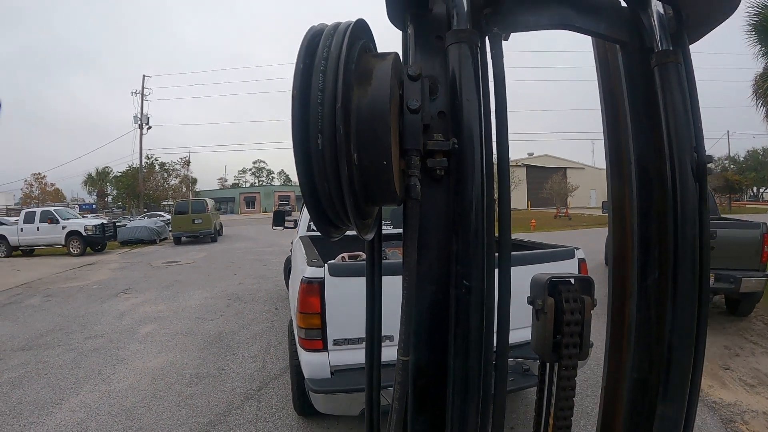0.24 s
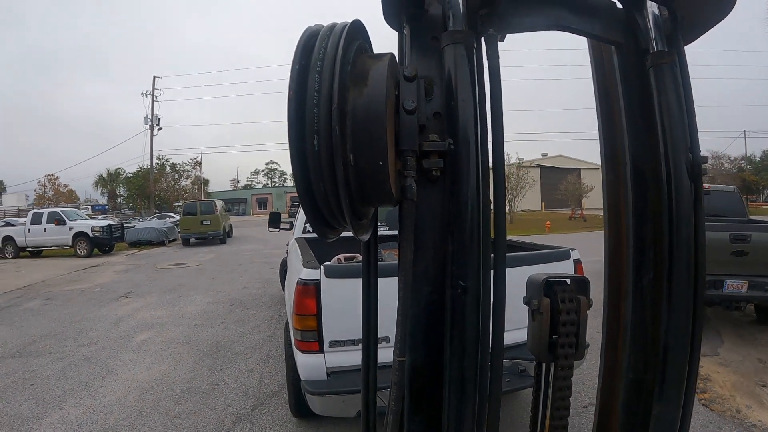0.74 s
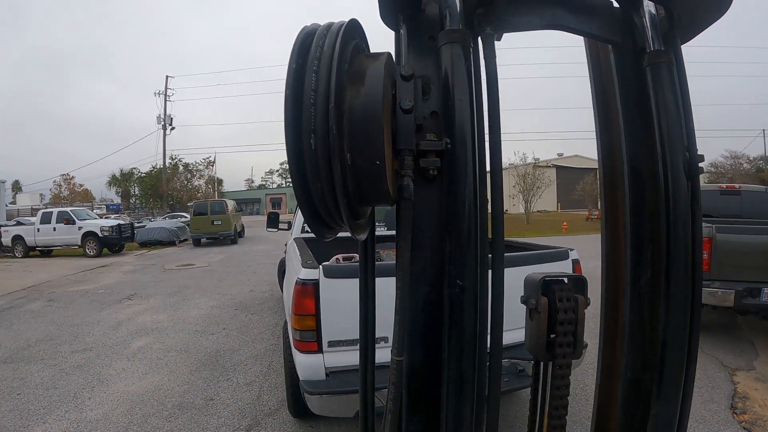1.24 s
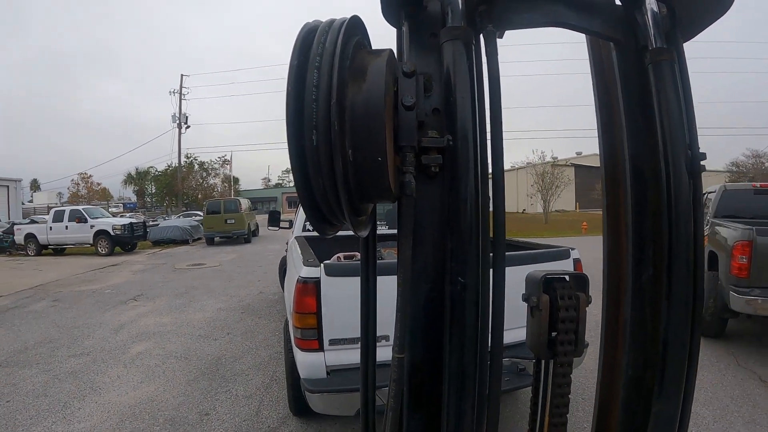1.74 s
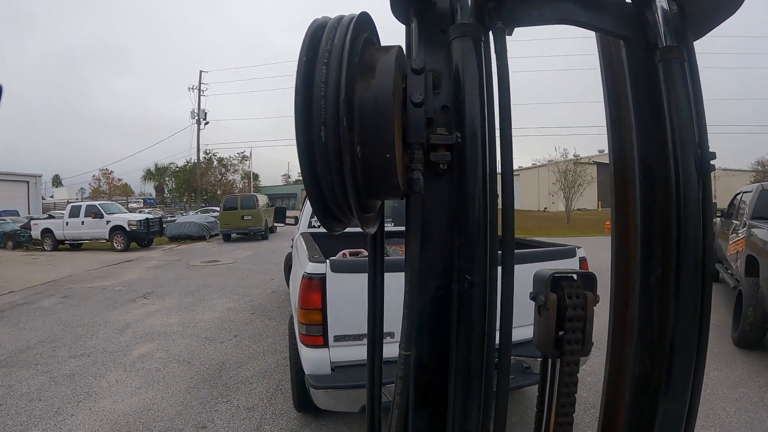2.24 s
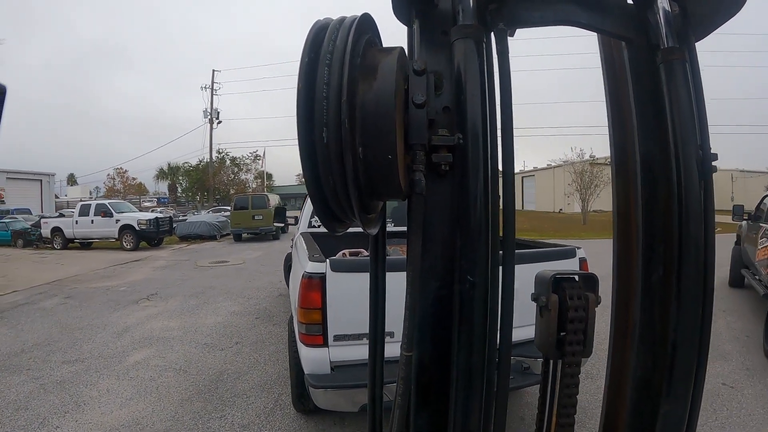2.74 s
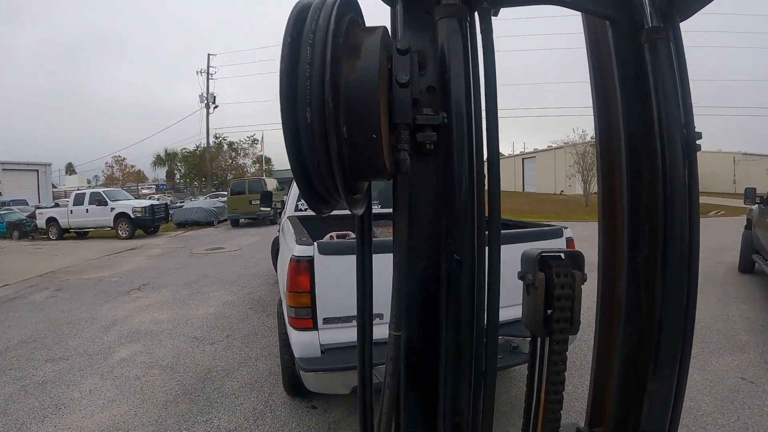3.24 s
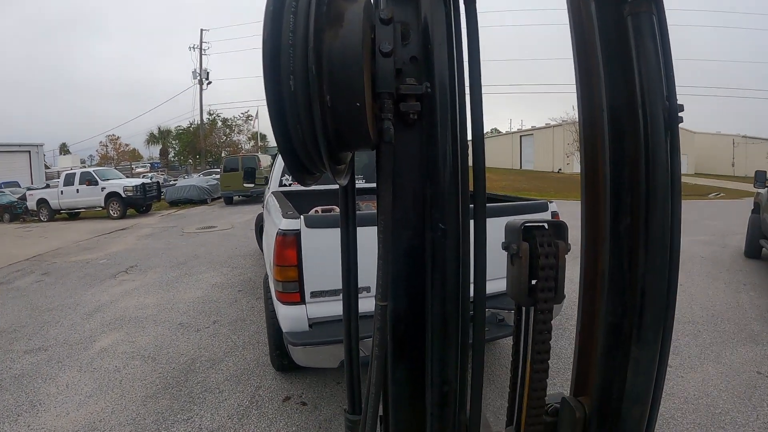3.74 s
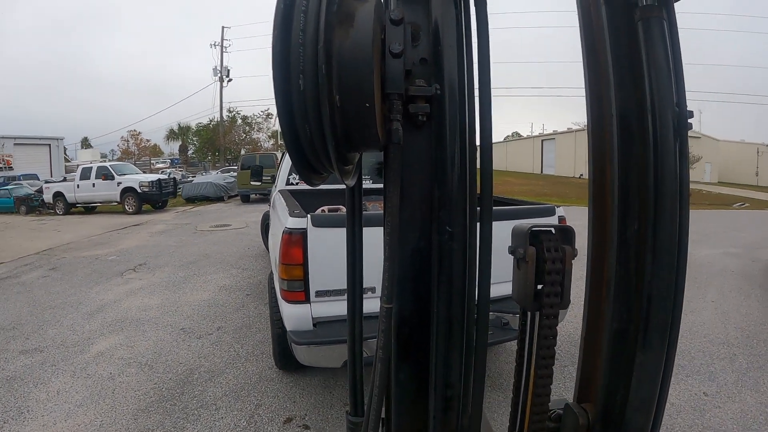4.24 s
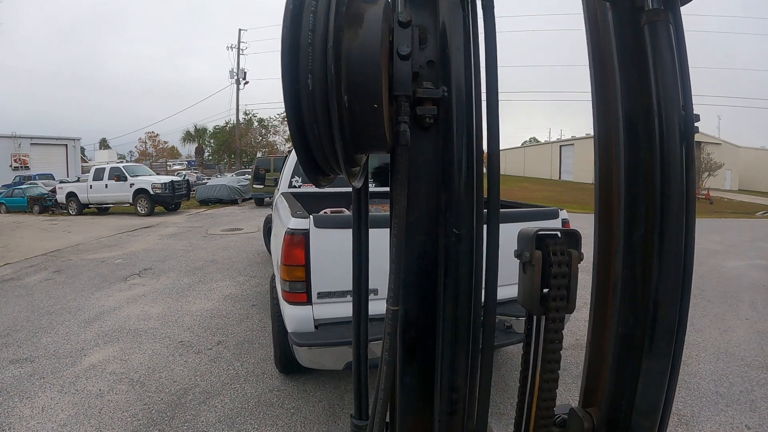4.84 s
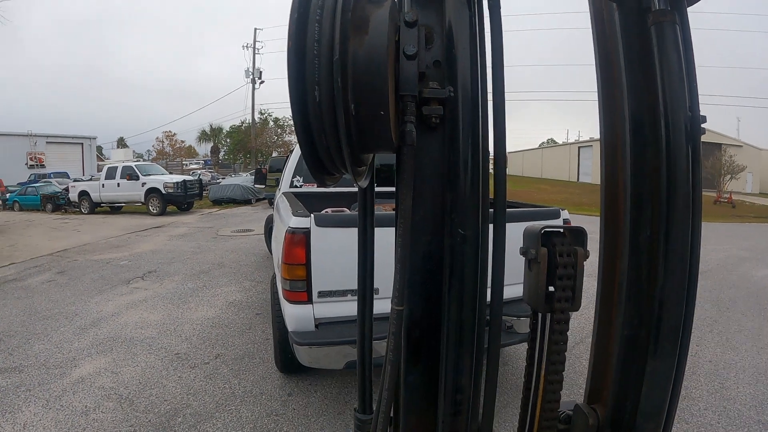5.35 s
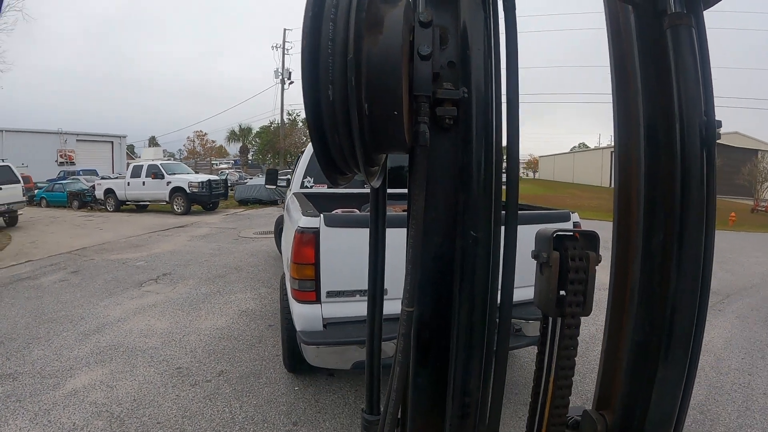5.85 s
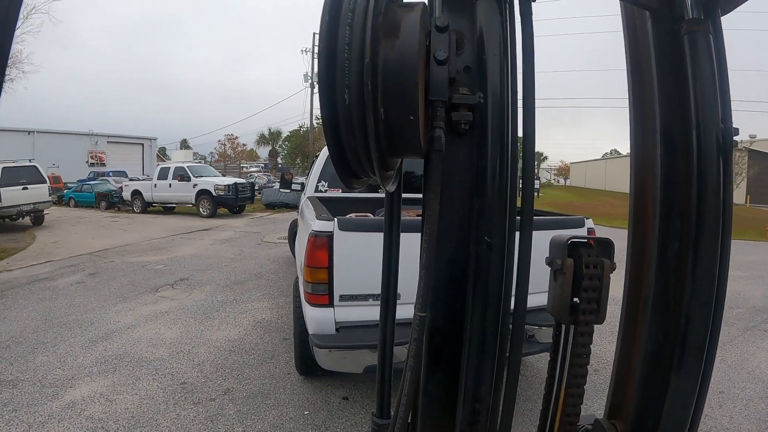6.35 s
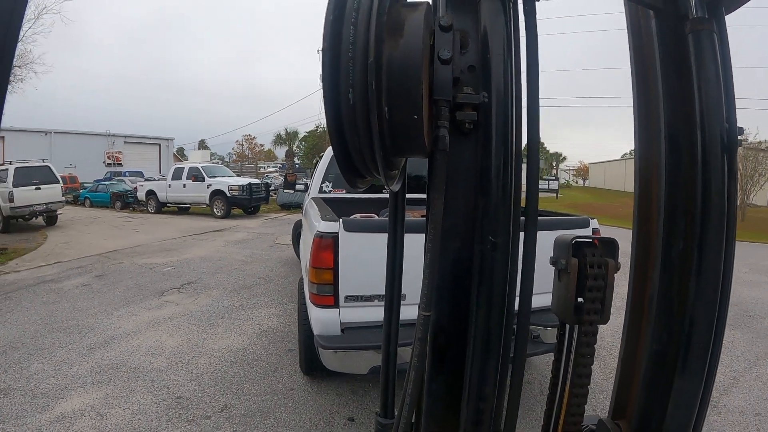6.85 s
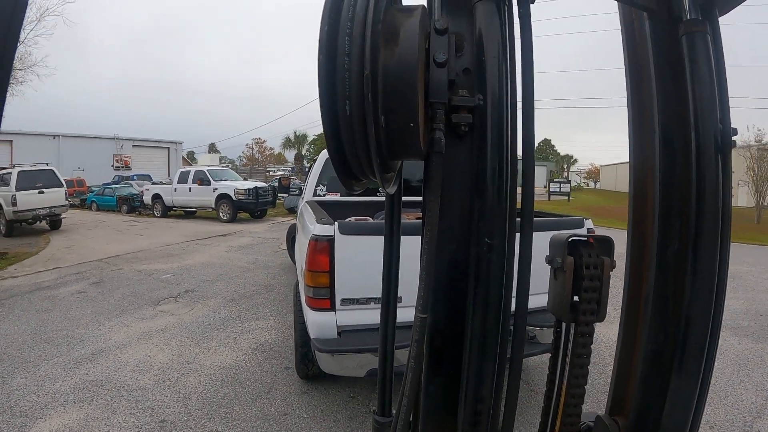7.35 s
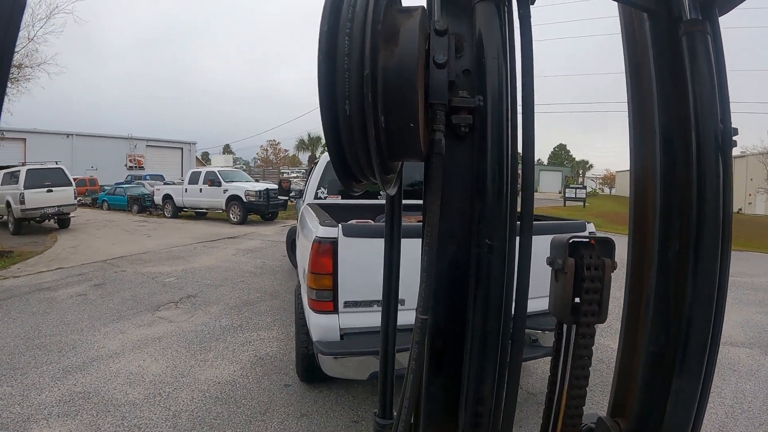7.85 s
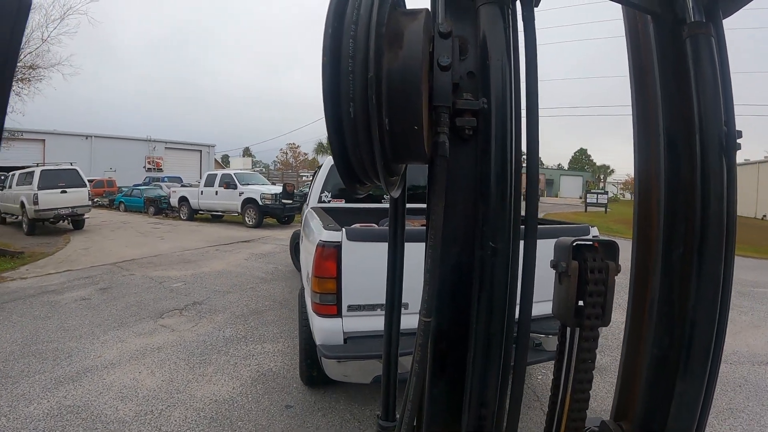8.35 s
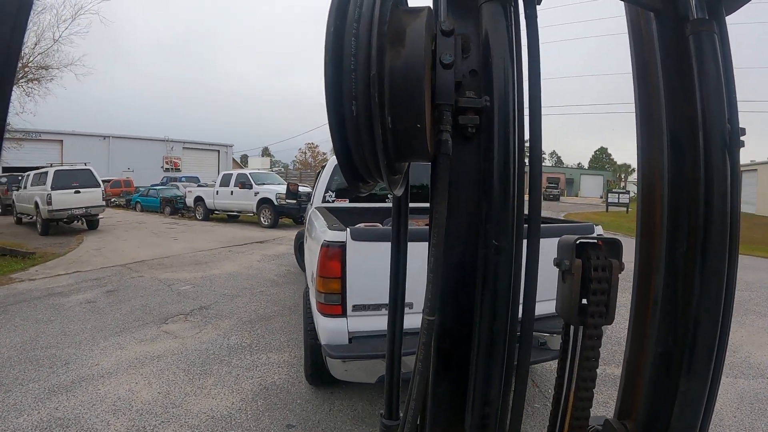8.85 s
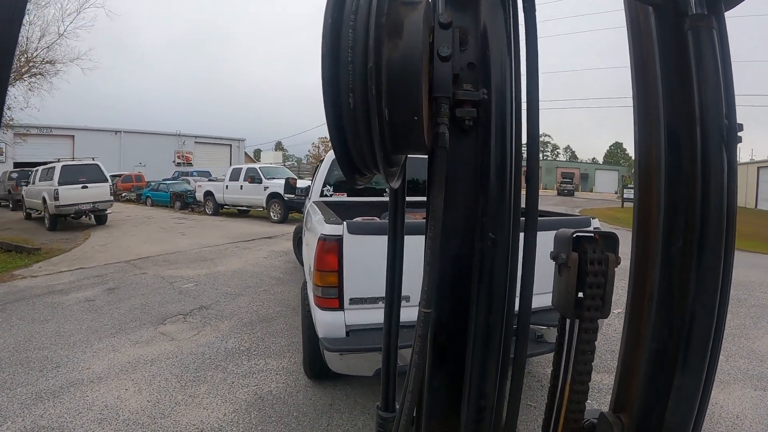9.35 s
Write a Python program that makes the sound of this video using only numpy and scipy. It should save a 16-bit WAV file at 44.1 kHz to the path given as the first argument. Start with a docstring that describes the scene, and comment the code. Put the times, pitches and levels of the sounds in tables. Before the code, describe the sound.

Heard from the driver's seat outdoors, a four-cylinder forklift engine holds a deep, steady throb with droning hood resonance, rattling valve noise and a faint breathy whistle. Loose chain slaps lightly against the mast. Near the middle a hard metallic knock and tiny squeal land as the engine drops away, then it races, sags toward idle, surges again, dips and settles.

```python
"""A parking lot: a four-cylinder forklift drives across it, heard from the driver's seat.
The exhaust booms at the firing rate and the hollow under the hood drones on multiples of it.
Noise bursts from valves and pistons ring the hood panels; each gulp of air whistles on a gliding tone.
Filtered impacts make the mast buzz, slap, clack and knock, with short squeaks; low noise is the chassis.
The engine drops away briefly, surges, dips and surges again, then settles."""
import sys
import numpy as np
from scipy import signal
from scipy.fft import rfft, irfft
from scipy.io import wavfile

SR = 44100
rng = np.random.default_rng(int(sys.argv[2]) if len(sys.argv) > 2 else 0)


def wav_record(signal):
    """Record a signal, one row per channel, as 16-bit PCM in the file named by sys.argv[1]."""
    frames = np.transpose(np.atleast_2d(signal))
    bounded = np.clip(frames, -1, 1)
    # unit amplitude maps onto the largest positive 16-bit level
    quanta = np.round(bounded * 32767).astype(np.int16)
    wavfile.write(sys.argv[1], SR, quanta)


N = 423360
T = np.arange(N) / SR
HZ = np.fft.rfftfreq(N, 1 / SR)

CRUISE_HZ = 51.0  # firing rate at cruising speed
LUG_HZ = 2.3  # the engine is fully labouring this far below cruising speed
GULP = .55  # how deeply each intake stroke swells the whistle
SLAP_DECAY_S = .0055  # how fast each slap of the chain dies
EDGE_HZ = 15700  # the treble is cut off above this
# the engine drops away once: start, hold, fade and return
LULL_S, LULL_HOLD_S, LULL_FADE_S, LULL_RETURN_S = 4.42, 0.24, 0.15, 0.15

# engine speed: (time [s], firing rate [Hz])
FIRING_RATE = [(0.0, 51.8), (1.84, 50.3), (4.42, 51.8), (4.6, 50.3), (4.76, 39.5), (4.93, 58), (5.03, 65.5),
               (5.22, 60.7), (5.42, 58.4), (5.54, 55), (5.68, 44.5), (6.0, 38.7), (6.2, 39.8), (6.42, 39.6),
               (6.68, 59.5), (6.86, 57.3), (7.12, 46.5), (7.28, 40.8), (7.56, 51.6), (8.1, 50.2),
               (8.55, 51), (8.73, 48.3), (8.98, 51.8), (9.28, 46.3), (9.6, 48)]
# exhaust boom: (time [s], level [dB])
BOOM_LEVEL = [(0, -18), (4.4, -18), (4.52, -22), (4.68, -31.5), (4.9, -17.5), (5.1, -19.5), (5.45, -20.5),
              (5.83, -25), (6.05, -20.5), (6.4, -21.5), (6.65, -18), (7.0, -20.5), (7.2, -25.5),
              (7.36, -17), (8.35, -17.5), (8.6, -23), (8.8, -18), (9.6, -21)]
# weak firings: (time [s], share of the boom lost [0-1])
WEAK_FIRINGS = [(.71, 0.78), (1.77, .5), (1.93, 0.37), (2.09, .45), (2.43, .7), (2.99, .55), (3.25, 0.36)]
# engine orders in the hollow under the hood: (multiple of the firing rate [x], relative level [dB])
ENGINE_ORDERS = [(2.5, -10.5), (3, -7), (3.5, 2), (4, -3.5), (4.5, -3), (5, 0.5)]
# spectrum of the hollow under the hood: (frequency [Hz], relative density [dB per Hz])
HOLLOW = [(60, -38), (120, -7.5), (155, -8.5), (182, -4.5), (204, 0), (230, -5.5), (258, -13.5),
          (310, -19.5), (400, -35.5), (1000, -77.5)]
# spectrum of the engine block: (frequency [Hz], relative density [dB per Hz])
BLOCK = [(40, -1), (280, 4), (460, 0.5), (850, -1), (1100, -1), (1950, 1), (2220, -10.5), (2500, -12),
         (3400, -15.5), (4100, -20), (7600, -29.5), (8300, -34), (10000, -35.5), (11000, -44), (15000, -56)]
# resonances of the hood panels: (frequency [Hz], width [Hz], lift [dB])
HOOD_PANELS = [(379.4, 63, 6), (601, 55, 7), (674.2, 91.6, 13.5), (764, 60, 4.5), (936.4, 69, 8.5),
               (1031.6, 71.3, 15.5), (1189, 87, 6), (1635, 117, 5), (1885, 110, 2), (3295, 115, 5),
               (4540, 240, 11), (9140, 730, 6)]
# spectrum of the hood drumming near idle: (frequency [Hz], relative density [dB per Hz])
HOOD_DRUM = [(40, -41), (150, -25), (300, -3.5), (450, -20), (610, 1), (690, 4.5), (800, -8), (1500, -50),
             (5000, -83)]
# thin upper whistle notes: (frequency [Hz], relative level [dB], lag [rad], sounds on every n-th stroke [n])
UPPER_NOTES = [(9830, -7, -.6, 2), (8780, -7, 1.2, 4)]
# spectrum of the lift chain: (frequency [Hz], relative density [dB per Hz])
CHAIN = [(200, -25), (800, -11), (2200, -6), (3700, 4), (5200, 0), (7400, -11.5), (8700, -13.5),
         (12000, -32), (16000, -48)]
# ringing of the chain's links: (frequency [Hz], width [Hz], lift [dB])
CHAIN_LINKS = [(3660, 88, 4), (4530, 91, 3), (5150, 220, 7.5), (6860, 110, 13.5), (7370, 140, 11)]
# slaps of the loose chain on the mast: (time [s], relative level [dB])
CHAIN_SLAPS = [(.033, -33), (.052, -27), (.072, -31), (.843, -35), (1.734, -31), (1.778, -34), (2.011, -33),
               (2.071, -29), (2.091, -29), (2.129, -31), (2.149, -33), (2.170, -26.5), (2.208, -32),
               (2.228, -31), (2.247, -29), (2.289, -31), (2.310, -31), (2.859, -33), (3.778, -31),
               (3.888, -30), (4.005, -32), (4.082, -34), (4.160, -31), (4.178, -28), (4.276, -29),
               (4.295, -28), (4.966, -31), (5.026, -35), (5.258, -35), (5.491, -33)]
# spectrum of loose steel: (frequency [Hz], relative density [dB per Hz])
LOOSE_STEEL = [(200, -20), (800, -3), (2200, -8), (3600, 2), (5200, 1), (7400, -3), (8700, -12),
               (12000, -24), (16000, -42)]
# clacks of loose mast parts: (time [s], relative level [dB], decay time [s])
CLACKS = [(4.387, -25, .007), (4.401, -24, .005), (4.412, -26, .004), (4.43, -29, .004), (4.453, -32, .005),
          (4.462, -28.5, .007), (4.473, -28, .004), (4.487, -37, .005), (4.532, -26, .006),
          (7.412, -34, .005), (7.417, -28.5, .004), (7.422, -28.5, .006), (8.589, -35, .008)]
# spectrum of the heavy frame: (frequency [Hz], relative density [dB per Hz])
HEAVY_FRAME = [(30, -10), (95, 5), (180, 1), (280, -6), (550, -4), (820, -3), (1400, -4), (1900, -1.5),
               (2400, -12), (3500, -8), (6000, -25), (11000, -37), (15000, -48)]
# heavy knocks of the mast on its frame: (time [s], relative level [dB], decay time [s])
KNOCKS = [(4.389, -13, .006), (4.400, -7.5, .005), (4.408, -9, .005), (4.421, -17, .005),
          (4.437, -19, .006)]
# ringing modes of the mast: (frequency [Hz], lift [dB], time to fall 60 dB [s])
MAST_MODES = [(544, 5, .06), (813, 10, .15), (995, 4, .04), (1755, 4, .06), (1992, 7, .06), (2686, 7, .06),
              (3219, 5, .05), (3860, 6, .05), (4554, 5, .05), (5340, 3, .04), (6780, 2, .04),
              (7418, 7, .06)]
# notes of the dry metal squeal: (frequency [Hz], relative level [dB])
SQUEAL_NOTES = [(4560, -1), (7420, 4), (8470, -13), (10420, -19)]
# squeaks of the mast: (time [s], level [dB], length [s])
SQUEAKS = [(4.389, -23, 0.01), (4.408, -41, 0.026), (5.188, -40.5, 0.015)]
# spectrum of the chassis rumble: (frequency [Hz], relative density [dB per Hz])
CHASSIS = [(10, -25), (22, -15), (35, 2), (75, -2.5), (110, -8.5), (200, -35.5), (500, -85.5)]
# shudders of the chassis as the drive takes up or sheds load: (time [s], lift [dB], half length [s])
SHUDDERS = [(5.25, 4.5, 0.17), (5.87, 2, 0.16), (6.7, 7, 0.35), (7.22, 0.5, 0.1), (8.57, 11.5, 0.22),
            (9.43, 1.5, 0.081)]
# how layers follow the engine, as single rows:
# (relative level at cruise [dB], change per octave of speed [dB], when labouring [dB], in the lull [dB])
DRONE_LAW = (-29.5, 6, 1, -5)
CLATTER_LAW = (-26.5, 2.5, -1, -4.5)
BUZZ_LAW = (-54.5, 8, -2, -3)
SHAKE_LAW = (-34, 3.5, 6.5, -8)
# likeness of the left and right sides: (frequency [Hz], likeness [0-1])
LIKENESS = [(60, 1.0), (96, 0.99), (150, 0.98), (240, 0.99), (430, 0.98), (640, 0.95), (1000, 0.96),
            (1400, .89), (2000, .82), (2400, .6), (3200, .72), (4600, .76), (6830, .67), (10100, .6)]
# balance of the sides: (frequency [Hz], left minus right [dB])
LEAN = [(60, -.5), (96, -1), (150, 0.0), (290, .3), (400, 1.7), (750, 2.6), (900, 4.4), (1700, 3.8),
        (2400, -2.5), (3250, 5), (4300, -1.5), (5400, .8), (6400, -1), (9500, 3)]
# phase by which the left side leads: (frequency [Hz], lead [rad])
LEAD = [(1000, 0), (2150, -1.45), (2400, 0), (3400, -.95), (4400, -.1), (6000, 0)]


def amp(db):
    """Decibels to gain."""
    return np.exp(np.log(10) / 20 * np.asarray(db))


def unit(x):
    """Scales to rms 1."""
    return x / np.sqrt(np.mean(x ** 2) + 1e-20)


def curves(rows):
    """Each column of a time table, sample by sample."""
    s, *columns = np.transpose(rows)
    return [np.interp(T, s, c) for c in columns]


def read(points, at=HZ):
    """A spectrum joined on a log-frequency axis."""
    hz, value = np.transpose(points)
    return np.interp(np.log(at + 1), np.log(hz + 1), value)


def wander(rate_hz):
    """Random drift of rms 1, mostly slower than the given rate."""
    slow_hz = HZ[:N // 32]
    a, b = rng.standard_normal((2, len(slow_hz)))
    return unit(irfft((a + 1j * b) / (1 + (slow_hz / rate_hz) ** 4), N))


def colour(x, spectrum, resonances=()):
    """Causal filter of unit power: a broad spectrum with ringing peaks on top."""
    peaks_db = sum(lift * np.exp2(-(2 * (HZ - hz) / width) ** 2) for hz, width, lift in resonances)
    cepstrum = irfft(np.log(unit(amp(read(spectrum) + peaks_db))), N)
    # folding the cepstrum forward gives minimum phase, so nothing sounds before its cause
    cepstrum[1:N // 2] *= 2
    cepstrum[N // 2 + 1:] = 0
    return irfft(rfft(x) * np.exp(rfft(cepstrum)), N)


def spread(pair):
    """Two signals become a stereo pair: alike in the bass, looser and out of step in the treble."""
    a, b = rfft(pair)
    same = np.clip(read(LIKENESS), 0, 1)
    mid = a * np.sqrt((1 + same) / 2)
    side = b * np.sqrt((1 - same) / 2)
    lean = amp(read(LEAN) / 2) * np.exp(.5j * read(LEAD))
    return irfft(np.array([(mid + side) * lean, (mid - side) / lean]), N)


def lull():
    """Rises from 0 to 1 as the engine drops away, holds, and lets go."""
    end = LULL_S + LULL_FADE_S + LULL_HOLD_S + LULL_RETURN_S
    return np.clip(np.minimum((T - LULL_S) / LULL_FADE_S, (end - T) / LULL_RETURN_S), 0, 1)


def level(law, fire_hz):
    """A layer's dB from the engine's speed, its labouring at low revs and the lull."""
    cruise_db, octave_db, lug_db, lull_db = law
    labour = np.clip((CRUISE_HZ - fire_hz) / LUG_HZ, 0, 1) ** 2
    return cruise_db + octave_db * np.log2(fire_hz / CRUISE_HZ) + lug_db * labour + lull_db * lull()


def works(firings, repeat, throb):
    """Valve and piston noise, pulsing with each firing; a share repeats every four firings."""
    size = int(4 * SR / CRUISE_HZ)
    pattern = signal.resample(rng.standard_normal((2, size)), size * 8, axis=1)
    place = (firings % 4 / 4 * pattern.shape[1]).astype(int)
    cycle = unit(pattern[:, place])
    noise = np.sqrt(repeat) * cycle + np.sqrt(1 - repeat) * rng.standard_normal((2, N))
    return unit(noise * np.exp(throb * np.cos(2 * np.pi * firings)))


def exhaust(firings, fire_hz, boom_db, waver_db=0.5, second_db=-14.0, rev_db=14,
            rock_db=-29, rock_hz=31, rock_width_hz=3.0, stumble_s=0.015):
    """A clean boom at the firing rate that stumbles on weak firings; its octave grows away from cruise."""
    angle = 2 * np.pi * firings
    lost = sum(share * np.exp(-((T - s) / stumble_s) ** 2) for s, share in WEAK_FIRINGS)
    boom = amp(boom_db + waver_db * wander(5.3)) * (1 - lost) * np.cos(angle)
    off_cruise_db = rev_db * abs(np.log(fire_hz / CRUISE_HZ))
    octave = amp(boom_db + second_db + off_cruise_db + 1.2 * wander(7)) * np.cos(2 * angle + 1)
    # once a turn (two firings) the crank rocks the engine on its mounts, which resonate at high revs
    mounts = 1 / (1 + ((fire_hz / 2 - rock_hz) / rock_width_hz) ** 2)
    rocking = amp(rock_db) * mounts * np.cos(angle / 2)
    return np.sqrt(2) * (boom + octave + rocking)


def drone(firings, fire_hz, drone_db, rough_db=0.5, clear_db=2.0,
          hollow_hz=200, hollow_width_hz=16, hollow_db=3):
    """Rough noise fills the hollow under the hood; as the engine races, its orders stand clear of it."""
    smooth_db, buried_db, blur, racing_hz, heave_db = 5, 9, 1.3, 6, .8
    calm = 1 - np.clip((fire_hz - CRUISE_HZ) / racing_hz, 0, 1)
    noise = works(firings, repeat=0.04, throb=0.23)
    rough = colour(noise, HOLLOW, [(hollow_hz, hollow_width_hz, hollow_db)])
    rough = rough * amp(rough_db - smooth_db * (1 - calm) + heave_db * wander(2.4))
    orders = np.zeros(N)
    for k, db in ENGINE_ORDERS:
        # each order swells as it glides through the hollow's resonance
        gain = amp(db + read(HOLLOW, k * fire_hz))
        orders += gain * np.cos(2 * np.pi * k * firings + blur * calm * wander(3.94))
    return (spread(rough) + np.sqrt(2) * orders * amp(clear_db - buried_db * calm)) * amp(drone_db)


def clatter(firings, effort_db, level_db=1, flicker_db=1.0):
    """The engine's valve and piston noise rings the hood panels."""
    drive = works(firings, repeat=0.33, throb=0.16)
    return colour(drive * amp(effort_db + level_db + flicker_db * wander(25)), BLOCK, HOOD_PANELS)


def drumming(firings, fire_hz, level_db=-32, below_hz=44, full_hz=40, lull_db=-14):
    """Near idle the engine's shaking sets the hood drumming."""
    idle = np.clip((below_hz - fire_hz) / (below_hz - full_hz), 0, 1)
    drive = works(firings, repeat=0.23, throb=0.17)
    return colour(drive * idle * amp(level_db + lull_db * lull()), HOOD_DRUM)


def whistle(firings, fire_hz, effort_db, pitch_hz=4720, lift_hz=230, follow=1.4):
    """Each intake stroke whistles from high to low; strokes vary, and slow ones gulp deeper."""
    level_db, uneven_db, slow_db = -51.5, 1.8, 6
    swing_hz, swing_uneven, snap, sloppy = 140, .3, 2.5, .4
    breath, jitter_hz, blur_hz = 1.0, 110, 300
    upper_uneven_db, upper_slow_db = 3, 12
    angle = 2 * np.pi * firings + sloppy * wander(24.88)
    slow = CRUISE_HZ / fire_hz
    effort = follow * (effort_db - np.median(effort_db))
    loudness = amp(level_db + effort + slow_db * np.maximum(slow - 1, 0) + uneven_db * wander(19))
    swing = swing_hz * slow ** 2 * (1 + swing_uneven * wander(24.9))
    main_hz = pitch_hz + lift_hz * (slow - 1) + swing * np.tanh(snap * np.cos(angle + 1.31))

    def note(hz, late):
        """A breathy tone of unsteady pitch that swells with each stroke."""
        phase = 2 * np.pi * np.cumsum(hz + jitter_hz * wander(50.25)) / SR
        steady = (slow + breath * wander(blur_hz)) * np.cos(phase)
        tone = steady + breath * wander(blur_hz) * np.sin(phase)
        return tone * unit(np.exp(GULP * slow ** 2 * np.cos(angle - late)))

    def beat(late, every):
        """Opens on every n-th stroke."""
        its_turn = np.round((angle - late) / (2 * np.pi)) % every == 0
        return np.clip(1 + np.cos(angle - late), 0, 1) * its_turn

    upper = np.zeros(N)
    for hz, db, late, every in UPPER_NOTES:
        upper += amp(db + upper_uneven_db * wander(25)) * beat(late, every) * note(hz, late)
    direct = note(main_hz, 0) + upper * amp(upper_slow_db * (slow - 2.0))
    return loudness * np.array([direct, direct * wander(blur_hz)])


def bursts(rows):
    """Each contact is a quick flurry of tiny impacts that dies away."""
    rise_s, impacts_per_s = .001, 9000
    power = np.zeros(N)
    for s, db, decay_s in rows:
        start = int(s * SR)
        t = T[:min(SR // 2, N - start)]
        power[start:][:len(t)] += (amp(db) * (1 - np.exp(-t / rise_s)) * np.exp(-t / decay_s)) ** 2
    signs = np.sign(rng.standard_normal((2, N)))
    impacts = signs * (rng.random((2, N)) < impacts_per_s / SR)
    return np.sqrt(power) * unit(impacts)


def ring(x):
    """A blow on the mast, and the steel ringing on in its modes."""
    t = T[:SR // 2]
    modes = np.zeros(len(t))
    for hz, db, t60 in MAST_MODES:
        rate = np.log(1000) / t60
        modes += amp(db) * 2 * rate / SR * np.exp(-rate * t) * np.cos(2 * np.pi * hz * t)
    return x + signal.oaconvolve(x, modes[None], axes=1)[:, :N]


def mast(firings, buzz_db, slap_db=-1.0, sharpness=0.38):
    """The chain chatters with the engine's shaking and slaps the mast; loose parts clack, the frame knocks."""
    fitful_db, clack_db, knock_db = 2.0, -1.5, -4.2
    shaking = unit(np.exp(sharpness * np.cos(2 * np.pi * firings)))
    chatter = shaking * amp(buzz_db + fitful_db * wander(6.0)) * rng.standard_normal((2, N))
    slaps = amp(slap_db) * bursts([(s, db, SLAP_DECAY_S) for s, db in CHAIN_SLAPS])
    clacks = amp(clack_db) * colour(bursts(CLACKS), LOOSE_STEEL)
    knocks = amp(knock_db) * colour(bursts(KNOCKS), HEAVY_FRAME)
    return colour(chatter + slaps, CHAIN, CHAIN_LINKS) + ring(clacks + knocks)


def thud(hz=96, decay_s=0.035, level_db=-9):
    """The hardest knock sets the heavy frame bouncing for a few cycles."""
    hardest_s = max(KNOCKS, key=lambda row: row[1])[0]
    t = np.maximum(T - hardest_s, 0)
    return amp(level_db) * np.exp(-t / decay_s) * np.sin(2 * np.pi * hz * t)


def squeaks(unsteady_hz=30):
    """Steel slips on steel and squeals for an instant."""
    tone = np.zeros(N)
    for hz, db in SQUEAL_NOTES:
        tone += amp(db) * np.sin(2 * np.pi * np.cumsum(hz + unsteady_hz * wander(255)) / SR)
    swell = np.zeros(N)
    for s, db, length_s in SQUEAKS:
        arch = np.sin(np.pi * np.clip((T - s) / length_s, 0, 1))
        swell += amp(db) * np.sqrt(np.maximum(arch, 0))
    return unit(tone) * swell


def rumble(shake_db, apart_db=-14):
    """The chassis shakes over the asphalt and shudders now and then; a little differs on each side."""
    shudder_db = sum(db * np.exp(-((T - s) / half_s) ** 2) for s, db, half_s in SHUDDERS)
    shake = colour(rng.standard_normal((3, N)), CHASSIS) * amp(shake_db + shudder_db)
    return shake[0] + amp(apart_db) * shake[1:]


def scene():
    """One crankshaft drives the engine's layers, the chain's chatter and the chassis shake."""
    (fire_hz,), (boom_db,) = curves(FIRING_RATE), curves(BOOM_LEVEL)
    firings = np.cumsum(fire_hz) / SR
    effort_db = level(CLATTER_LAW, fire_hz)
    engine = exhaust(firings, fire_hz, boom_db) + drone(firings, fire_hz, level(DRONE_LAW, fire_hz))
    hood = clatter(firings, effort_db) + drumming(firings, fire_hz)
    intake = whistle(firings, fire_hz, effort_db)
    metal = mast(firings, level(BUZZ_LAW, fire_hz))
    background = thud() + squeaks() + rumble(level(SHAKE_LAW, fire_hz))
    return engine + spread(hood + intake + metal) + background


def record(dry):
    """Cuts the treble steeply above the band edge."""
    lowpass = signal.firwin(511, EDGE_HZ, window=("kaiser", 9), fs=SR)
    return signal.oaconvolve(dry, lowpass[None], "same")


dry = scene()
out = record(dry)
wav_record(out)
```